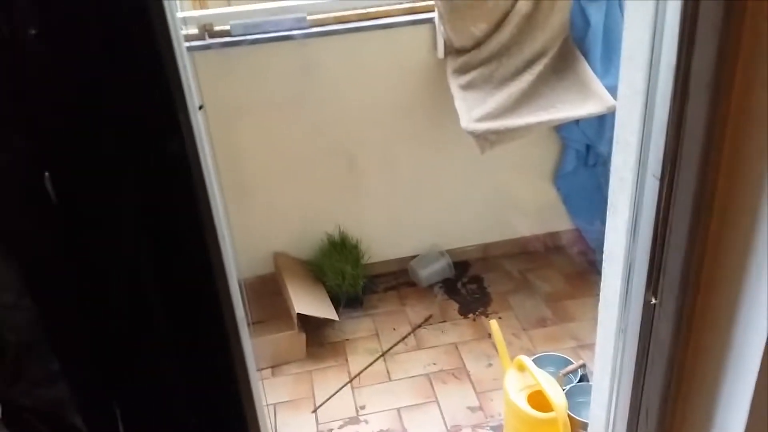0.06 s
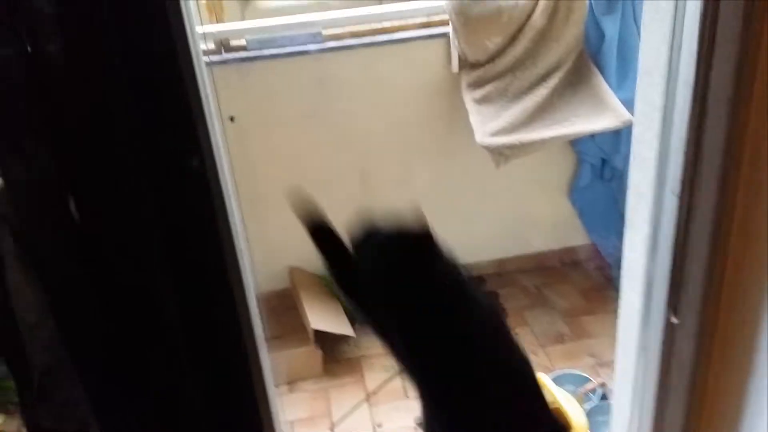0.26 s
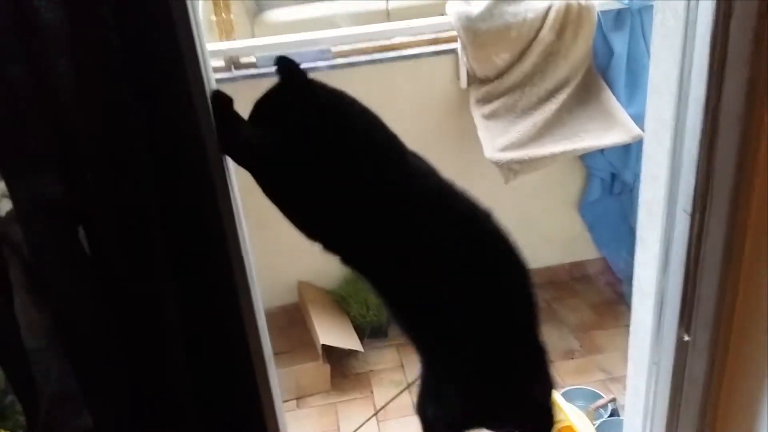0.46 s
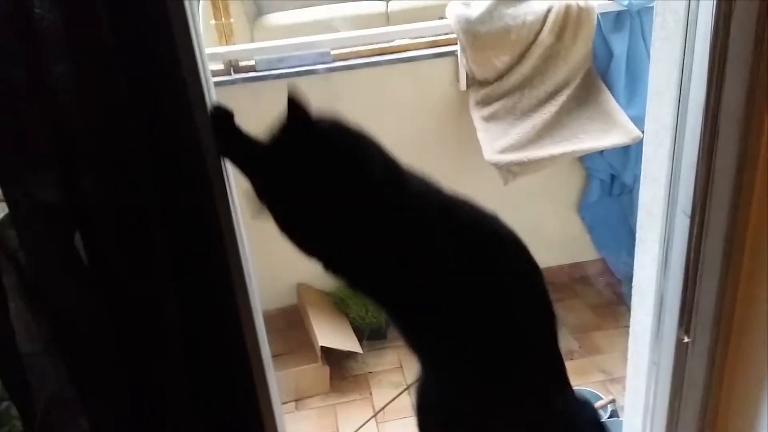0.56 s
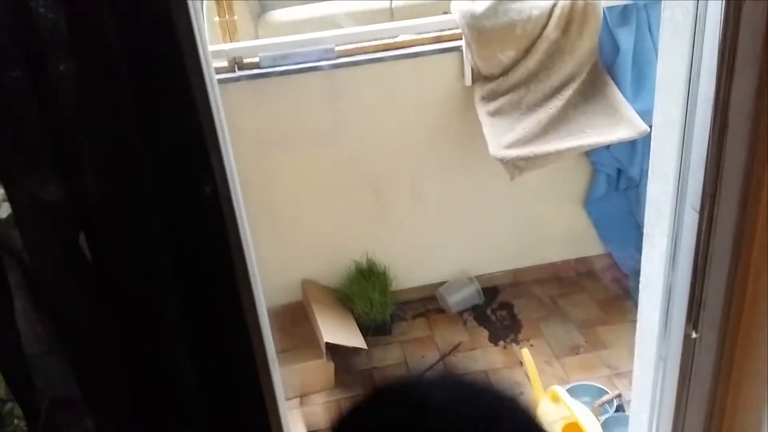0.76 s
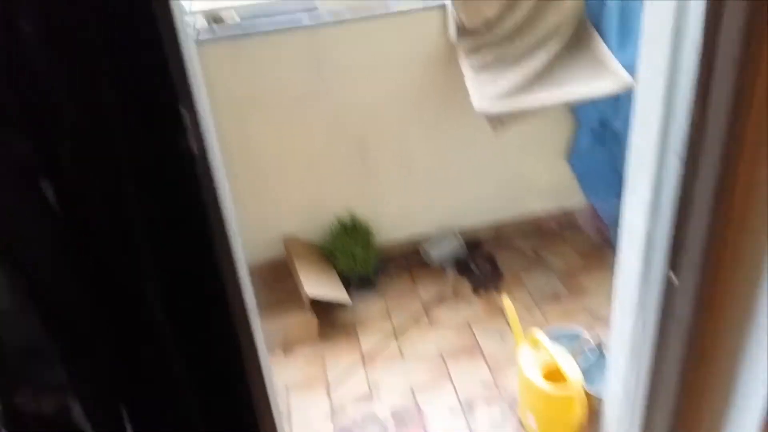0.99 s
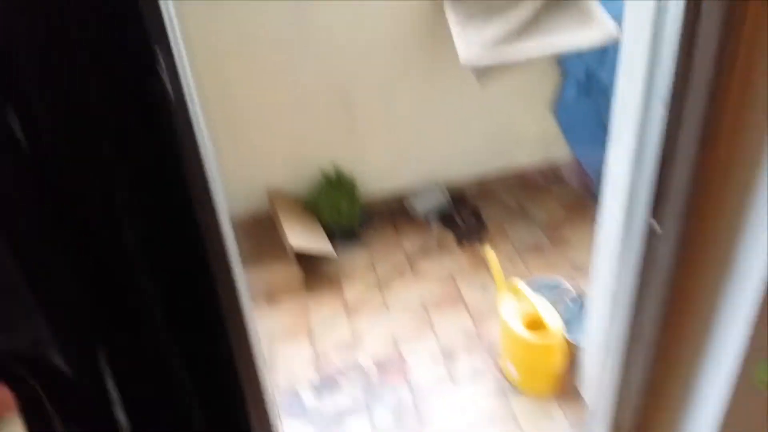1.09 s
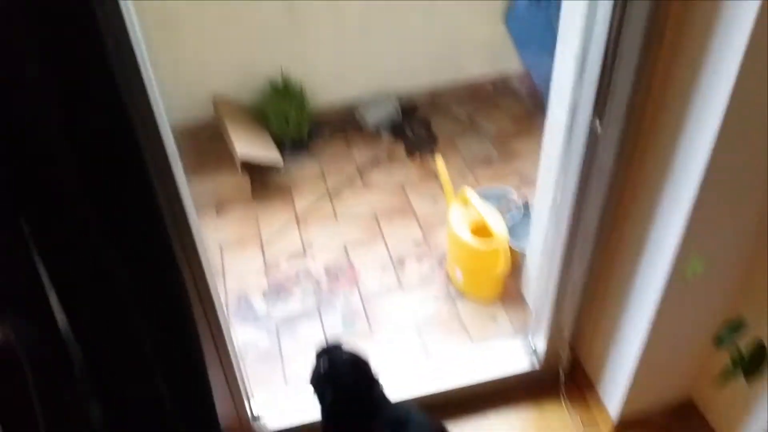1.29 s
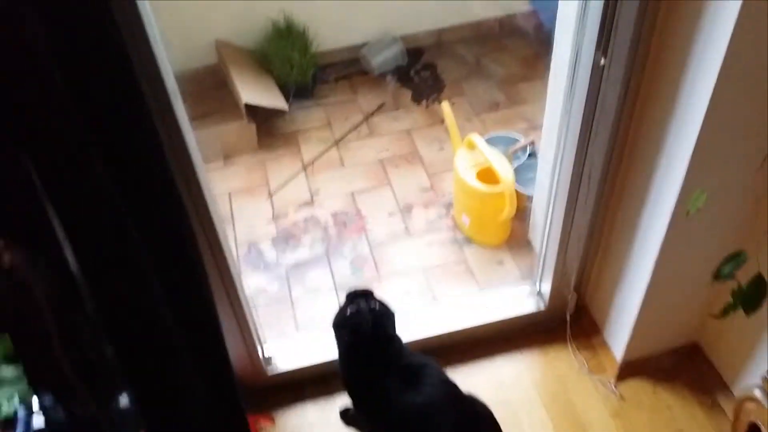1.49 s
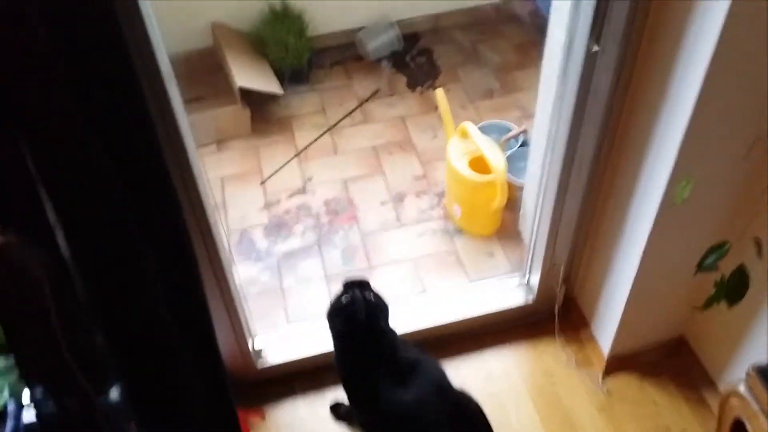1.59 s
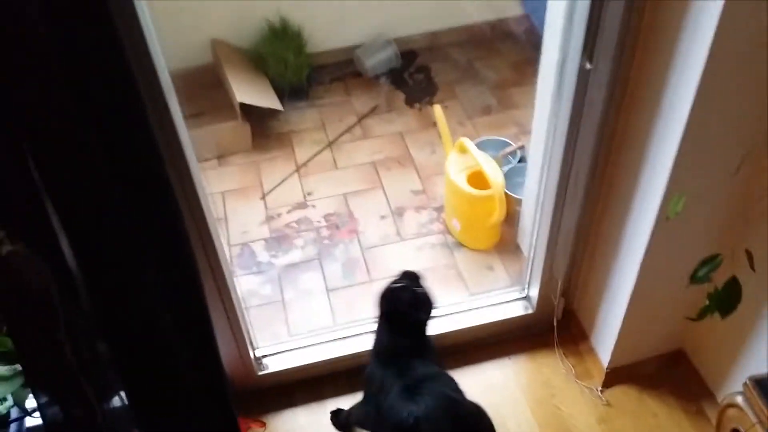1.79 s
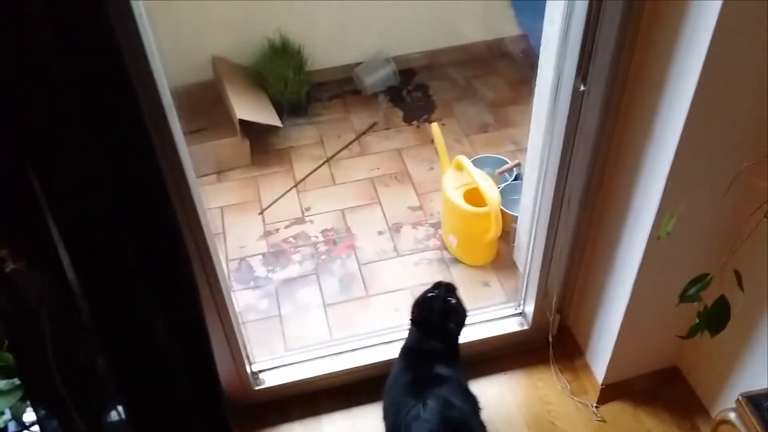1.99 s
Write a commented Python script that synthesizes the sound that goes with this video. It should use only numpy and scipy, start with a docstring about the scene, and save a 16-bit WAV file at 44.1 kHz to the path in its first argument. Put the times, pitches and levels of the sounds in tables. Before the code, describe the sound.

Cat thumps into a glass door, scratches down the frame and drops onto floorboards.

```python
"""A small quiet room with a glass door and a wooden floor. A cat springs with two soft take-off thumps,
then paws and body hit the pane; claws click and scrape down the frame; it drops on the boards, paw after
paw, and settles. Thumps are padded pushes ringing panel modes, clicks are noise bursts, rubs are dense
friction grains. A low hum with a faint hiss runs underneath and stops soon after the landing."""
import sys
import numpy as np
from scipy import signal
from scipy.fft import rfft, irfft, next_fast_len
from scipy.io import wavfile

SR = 44100
rng = np.random.default_rng(int(sys.argv[2]) if len(sys.argv) > 2 else 0)


def generate_wav(sig):
    """Save sig (samples, or channels by samples) to the path in sys.argv[1] as 16-bit PCM at SR."""
    pcm = np.round(np.clip(np.atleast_2d(sig).T, -1, 1) * 32767).astype(np.int16)
    wavfile.write(sys.argv[1], SR, pcm)


N = 90404

# background spectra: f/Hz, level/dB
HISS_SPECTRUM = [(40, -19.5), (206, -14.5), (700, -29), (3200, -32.5), (6780, -26.5), (14000, -45.5)]
AIR_SPECTRUM = [(26, -54.5), (45, -25), (300, -11), (382, -9), (650, -18.5), (1540, -22.5), (3560, -35),
                (6490, -22.5), (14000, -36.5)]
# room echo, pane and floor dense resonances: f/Hz, level/dB per half octave, t60/s
ROOM_BANDS = [(99.75, -23, 0.25), (493, -16.5, 0.81), (2030, -7, 0.26), (6140, -9, 0.39), (15200, 11, 0.12)]
PANE_BANDS = [(40, -31.5, 0.33), (115, -37, 0.45), (269, -13, 0.49), (700, -19.5, .15), (1470, -12.5, 0.34),
              (4000, -23.5, 0.18), (12000, -25, .15)]
FLOOR_BANDS = [(39.5, -45, 0.21), (120, -21, 0.12), (297, -15.5, 0.46), (689.3, -5, 0.11),
               (1498, -9.5, .37), (4030, -4, 0.24), (11880, -13.5, .27)]
# modes of pane, floor and door frame: f/Hz, level/dB
PANE_MODES = [(63, -6), (112, -23), (153, -2.5), (165, -8), (200, -11.5), (219, -6), (303, -11.5),
              (322, -8), (348, -14), (471, -4.5), (532, -15), (667, -15.5), (785, -15), (1185, -7.5),
              (1360, -2.5)]
FLOOR_MODES = [(86, -29.5), (196, -12.5), (239, -5), (287, -10), (374, -10), (406, -9.5), (460, -12),
               (473, -2.5), (505, 1.5), (606, -11), (671, -6), (968, 1.5), (1002, -2.5), (1196, -8)]
FRAME_MODES = [(442, 11), (845, 4), (1222, 6)]
# paw and fur rubs: t/s, rise/s, decay/s, level/dB, f/Hz, width/octaves
SCUFFS = [(0, 0.056, 0.72, -55, 4960, 2), (0.109, 0.0059, 0.0031, -41.5, 1300, 1.07),
          (0.181, 0.0081, 0.014, -32, 1550, 1.62), (0.267, 0.0041, 0.012, -35, 2840, 0.83),
          (0.301, 0.006, 0.022, -18.5, 4440, 3.3), (0.349, 0.0027, 0.032, -29, 2580, 2.1),
          (0.4, 0.0082, 0.015, -21.5, 2660, 0.87), (0.652, 0.036, 0.028, -41.5, 1320, 1.54),
          (0.859, 0.0072, 0.022, -53, 1150, 0.37), (0.953, 0.016, 0.034, -26, 3700, 2.7),
          (1.106, 0.024, 0.029, -40.5, 8380, 1.03), (1.124, 0.016, 0.081, -55, 1080, 1.47),
          (1.456, 0.0061, 0.013, -55.5, 3220, 1.95), (1.625, 0.0034, .015, -67.5, 382.6, 0.17),
          (1.63, 0.034, 0.063, -69.5, 5990, 1.02)]
# paws sliding on the frame: f/Hz, level/dB
SLIDE_SPECTRUM = [(300, -33.5), (1500, -21), (2500, -10), (3600, -6.5), (5200, 3), (6600, -2.5), (8000, -7),
                  (11000, -11), (15000, -19.5)]
# claw clicks: t/s, level/dB, f/Hz, width/octaves
CLAW_CLICKS = [(0.198, -27.5, 6300, 0.51), (.3040, -12, 6830, 0.22), (0.307, -16.5, 5176, .8),
               (0.3509, -9, 2500, 0.6), (0.4072, -11, 2595, 1.2), (0.4159, -14, 4203, 1.1),
               (0.421, -16, 5013, 0.74), (0.444, -22.5, 7000, 0.37), (0.5235, -20.5, 6570, 0.627),
               (0.9018, -19.5, 2391, 0.69), (0.925, -21.5, 4994, 0.84), (0.956, -20.5, 5480, 1.5),
               (0.9577, -16, 1400, 1.2), (1.464, -50, 3800, 1.5), (1.737, -61, 6055, 1.33),
               (1.864, -55.5, 6800, 0.81), (2.001, -60.5, 6000, 1.5)]
# two soft take-off thumps, then paws and body hit the pane: t/s, level/dB, hardness as corner f/Hz
LEAP_BLOWS = [(.187, -36, 1500), (.2216, -27.5, 348), (.3049, -27.5, 1044), (.3136, -22, 696),
              (.3215, -15.5, 788), (.3457, -16.5, 478), (.3577, -30, 567), (.4038, -31.5, 1500)]
# paws and body land on the boards: t/s, level/dB, hardness as corner f/Hz
LANDING_BLOWS = [(.898, -34.5, 3100), (.9061, -22.5, 930), (.9231, -25.5, 1882), (.9278, -25.5, 1750),
                 (.9338, -21, 970), (.9581, -26, 1800), (.9648, -16.5, 413), (.9782, -15.5, 293),
                 (.9952, -21, 440), (1.0213, -21.5, 326.5), (1.0597, -32, 340), (1.108, -38.5, 233.7),
                 (1.988, -60, 220), (1.997, -56.5, 180)]
# microphone colour: f/Hz, gain/dB
MIC_RESPONSE = [(30, 2), (5000, -1.5), (7100, 0.5), (7900, -8.5), (10000, -12), (15000, -24.5)]
# stereo balance: f/Hz, left minus right/dB
MIC_BALANCE = [(150, -0.5), (500, 0), (1000, -3), (2500, -4.5), (5500, -2.5), (10000, -7.5)]

TIME_S = np.arange(N) / SR
SPLIT_LR = np.array([[.5], [-.5]])


def amp(db):
    """Decibels to gain."""
    return 10 ** (np.asarray(db) / 20)


def unit(x):
    """Scale to rms 1."""
    return x / np.sqrt(np.mean(x ** 2))


def lookup(table, hz, column=1):
    """Interpolate a column over log frequency."""
    rows = np.array(table, float)
    return np.interp(np.log(hz), np.log(rows[:, 0]), rows[:, column])


def shape(x, gain):
    """Filter by gain(f)."""
    size = next_fast_len(N + N // 8)
    hz = np.maximum(np.fft.rfftfreq(size, 1 / SR), 1)
    return irfft(rfft(x, size) * gain(hz), size)[..., :N]


def band(x, hz, octaves):
    """Broad resonance with long skirts."""
    return shape(x, lambda f: 1 / (1 + (np.log2(f / hz) / octaves) ** 2))


def convolve(x, response):
    """Apply a stereo impulse response."""
    return signal.fftconvolve(np.atleast_2d(x), response, axes=-1)[:, :N]


def since(start_s):
    """Seconds since start_s, zero before."""
    return np.maximum(TIME_S - start_s, 0)


def swell(start_s, rise_s, decay_s):
    """Linear rise, exponential decay."""
    age_s = since(start_s)
    return np.minimum(age_s / rise_s, 1) * np.exp(-np.maximum(age_s - rise_s, 0) / decay_s)


def diffuse(gain, unrelated_hz=1080):
    """Coloured stereo noise, alike left and right in the bass only."""
    mid, side = rng.standard_normal((2, N))
    angle = lambda f: np.pi / 4 * np.minimum(f / unrelated_hz, 1)
    mid = shape(mid, lambda f: gain(f) * np.cos(angle(f)))
    side = shape(side, lambda f: gain(f) * np.sin(angle(f)))
    return np.array([mid + side, mid - side])


def dense_ring(bands, build_cycles=.7):
    """Dense resonances as decaying half-octave noise bands; lows build up last."""
    ring, noise = 0, diffuse(np.ones_like)
    for hz in 40 * 2 ** np.arange(0, 9, .5):
        part = shape(noise, lambda f: np.cos(np.pi * np.clip(np.log2(f / hz), -.5, .5)) ** 2)
        build_up = np.minimum(TIME_S * hz / build_cycles, 1)
        decay = np.exp(-np.log(1000) * TIME_S / lookup(bands, hz, column=2))
        ring = ring + amp(lookup(bands, hz)) * unit(part) * build_up * decay
    return ring


def door_frame(x, width_hz=24):
    """Narrow frame resonances colour a sound."""
    return shape(x, lambda f: 1 + sum(amp(db) / (1 + 2j * (f - hz) / width_hz) for hz, db in FRAME_MODES))


def still_air(level_db=-72):
    """Steady noise floor of the room."""
    return amp(level_db) * unit(diffuse(lambda f: amp(lookup(AIR_SPECTRUM, f))))


def hum_and_hiss(hum_hz=200.4, hum_db=-47.5, hiss_db=-55.5, stop_s=1.34, sag_db_per_s=8):
    """Wavering tone and faint hiss; both sag, then stop, the hiss more slowly."""
    hum_fade_s, hiss_fade_s = .028, .06
    waver_db = 0.57 * unit(band(rng.standard_normal(N), hz=2.4, octaves=.5))
    hum = amp(hum_db + waver_db) * np.sin(2 * np.pi * hum_hz * TIME_S)
    hiss = amp(hiss_db) * unit(door_frame(diffuse(lambda f: amp(lookup(HISS_SPECTRUM, f)))))
    hum *= np.exp(-since(stop_s) / hum_fade_s)
    hiss *= np.exp(-since(stop_s) / hiss_fade_s)
    return (hum + hiss) * amp(-sag_db_per_s * since(1.0))


def room(x, tail_db=-8):
    """Add the room's echo tail."""
    tail = dense_ring(ROOM_BANDS) * np.minimum(since(0.0012) / 0.012, 1)
    return x + convolve(x, amp(tail_db) * unit(tail) / np.sqrt(N))


def recess(x, direct_db=-4, early_db=1.5):
    """Direct sound plus early reflections of the door recess, different for every spot."""
    early = diffuse(np.ones_like) * swell(0, rise_s=0.00033, decay_s=.008)
    return amp(direct_db) * x + convolve(x, amp(early_db) * unit(early) / np.sqrt(N))


def friction(grains_per_s=14000, scatter_db=2):
    """Dense tiny catches of uneven size."""
    caught = rng.random(N) < grains_per_s / SR
    grains = caught * rng.standard_normal(N)
    return grains * amp(scatter_db * np.minimum(rng.exponential(size=N), 4))


def scuffs():
    """Paws and fur rub, coloured by the frame."""
    rubs = 0
    for start_s, rise_s, decay_s, db, hz, octaves in SCUFFS:
        rubs = rubs + amp(db) * swell(start_s, rise_s, decay_s) * unit(band(friction(), hz, octaves))
    return door_frame(rubs)


def paw_slide(level_db=-20.5):
    """Forepaws hiss down the frame, gather speed and let go."""
    rub = unit(shape(friction(), lambda f: amp(lookup(SLIDE_SPECTRUM, f))))
    return amp(level_db) * rub * swell(start_s=0.5389, rise_s=0.045, decay_s=0.028)


def claws():
    """Each claw tip catches with a short bright crack in the recess."""
    clicks = 0
    for start_s, db, hz, octaves in CLAW_CLICKS:
        crack = amp(db) * unit(band(rng.standard_normal(N), hz, octaves))
        clicks = clicks + recess(crack * swell(start_s, rise_s=0.00078, decay_s=0.0015))
    return clicks


def padded_force(blows):
    """One push per blow; the softer the contact, the longer the push."""
    force = 0
    for start_s, db, corner_hz in blows:
        age = 2 * np.pi * corner_hz * since(start_s)
        push = age * np.exp(-age)
        force = force + amp(db) * push / push.sum()
    return force


def panel_thumps(blows, modes, bands, t60_at_200hz_s, radiation_hz=133, knock_db=11, knock_s=0.0069):
    """Blows ring a panel: high modes die first, low ones radiate poorly, the onset knocks."""
    mic_lag_s, damping_slope = 0.00014, 0.45
    ring = 0
    for k, (hz, db) in enumerate(modes):
        lag_s = (-1) ** k * mic_lag_s * SPLIT_LR  # modes arrive from alternate sides
        damping_per_s = np.log(1000) / t60_at_200hz_s * (hz / 200) ** damping_slope
        ring = ring + amp(db) * np.sin(2 * np.pi * hz * (TIME_S + lag_s)) * np.exp(-damping_per_s * TIME_S)
    ring = signal.sosfilt(signal.butter(1, radiation_hz, "high", fs=SR, output="sos"), ring)
    knock = 1 + amp(knock_db) * np.exp(-TIME_S / knock_s)
    return convolve(padded_force(blows), ring + dense_ring(bands) * knock)


def scene():
    """The cat, coloured by the microphone, over the background."""
    scrapes = room(claws() + recess(scuffs()) + recess(paw_slide()))
    leap = panel_thumps(LEAP_BLOWS, PANE_MODES, PANE_BANDS, t60_at_200hz_s=0.51)
    landing = panel_thumps(LANDING_BLOWS, FLOOR_MODES, FLOOR_BANDS, t60_at_200hz_s=.31)
    cat = shape(leap + landing + scrapes, lambda f: amp(lookup(MIC_RESPONSE, f)))
    return hum_and_hiss() + still_air() + cat


def record(dry):
    """More treble on the right, rounded peaks, band limits."""
    peak_limit, low_cut_hz, high_cut_hz = .8, 33, 14900
    heard = shape(dry, lambda f: amp(SPLIT_LR * lookup(MIC_BALANCE, f)))
    heard = peak_limit * np.tanh(heard / peak_limit)
    heard = signal.sosfilt(signal.butter(4, low_cut_hz, "high", fs=SR, output="sos"), heard)
    return signal.sosfilt(signal.ellip(12, .2, 70, high_cut_hz, fs=SR, output="sos"), heard)


dry = scene()
out = record(dry)
generate_wav(out)
```